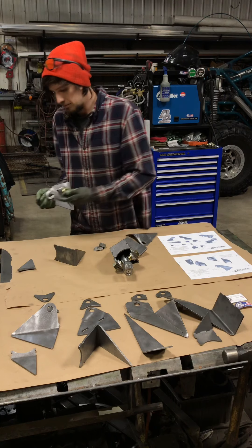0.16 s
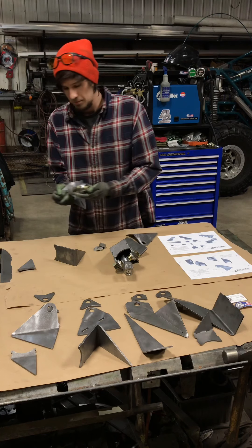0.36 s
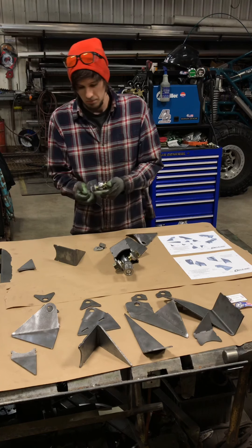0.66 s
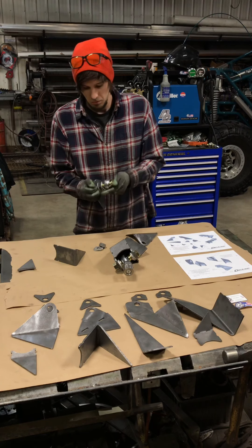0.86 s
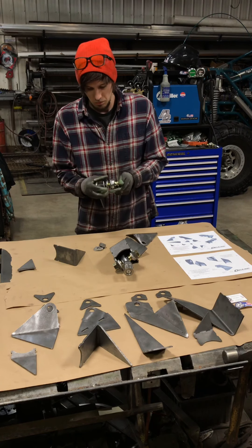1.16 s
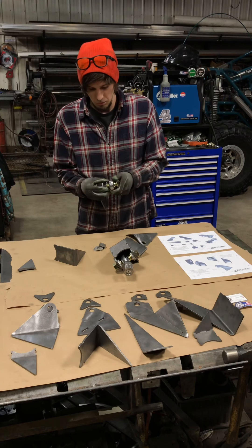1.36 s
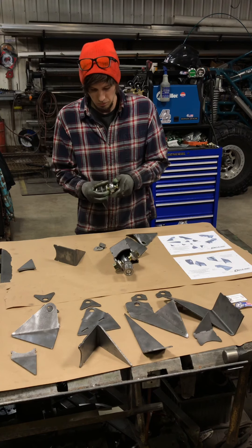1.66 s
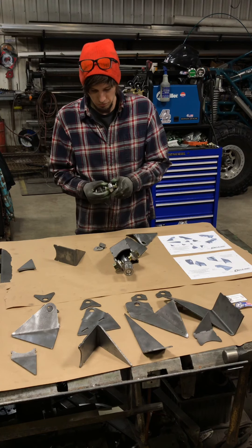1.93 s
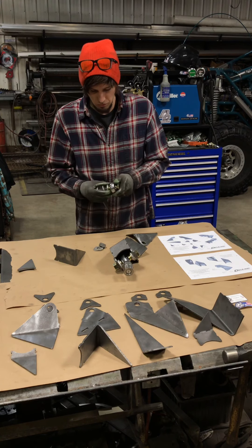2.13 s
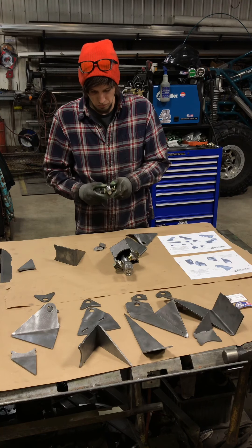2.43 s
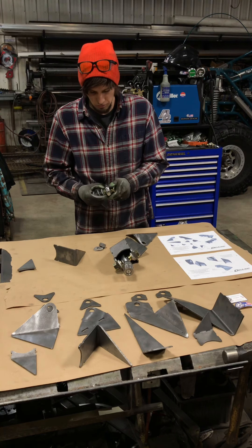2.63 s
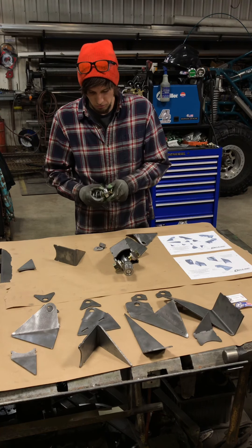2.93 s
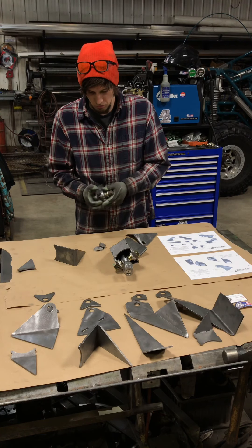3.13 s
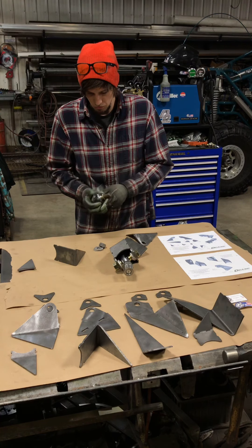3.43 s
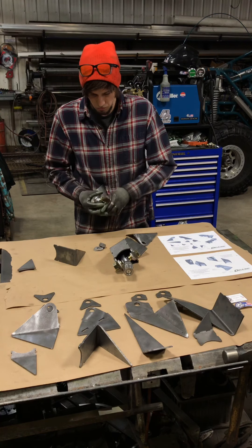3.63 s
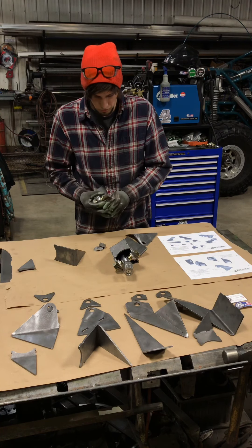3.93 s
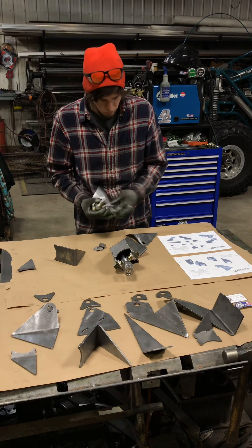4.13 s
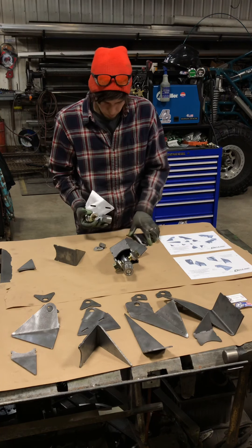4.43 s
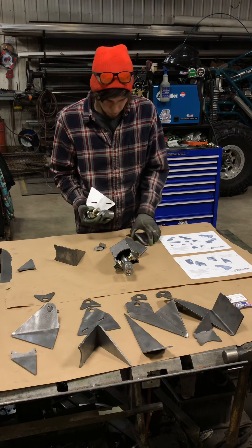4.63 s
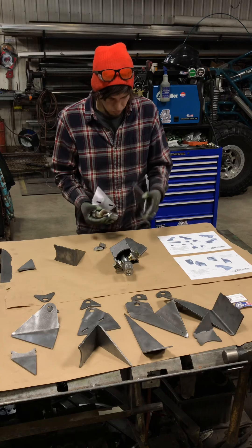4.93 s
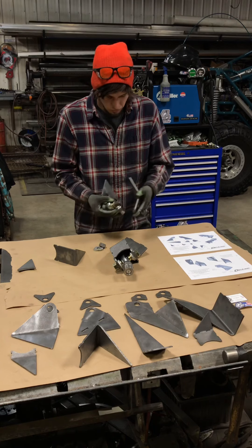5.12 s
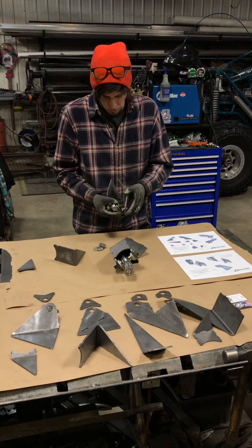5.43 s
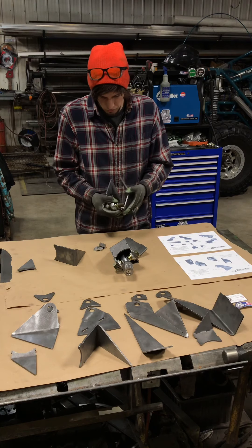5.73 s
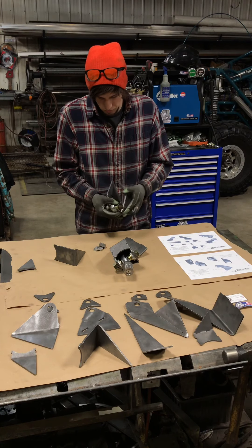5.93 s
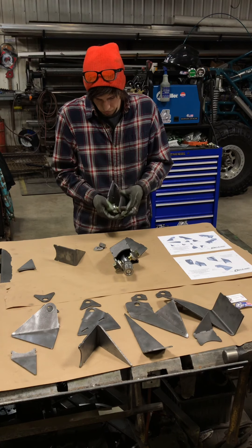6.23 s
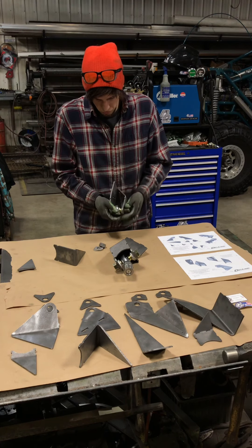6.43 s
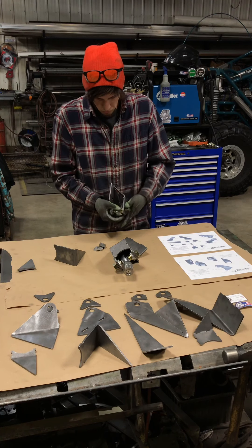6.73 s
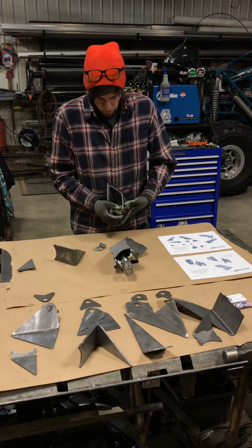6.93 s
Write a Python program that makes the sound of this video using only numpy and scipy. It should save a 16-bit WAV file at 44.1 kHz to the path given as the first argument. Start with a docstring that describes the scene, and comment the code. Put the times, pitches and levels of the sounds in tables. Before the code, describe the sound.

Bright bursts of metal clinking, soft thuds and a short scrape on a bench, then heavier plate clacks, over faint fan hum in a hall.

```python
"""In a workshop hall, gloved hands fit small steel parts together: tab, nut, washer and bracket, later a plate.
Each clink is a burst of chattering noise plus the ringing tones of the parts in the hands.
A plate bumps a cardboard-covered bench and scrapes along it; glove cloth rubs in soft, rough noise.
Behind this are a faint fan of steady tones, airy noise, a low tone that swells once, and the hall's echo."""
import sys
import numpy as np
from scipy import signal
from scipy.fft import rfft, irfft, next_fast_len
from scipy.io import wavfile
from scipy.ndimage import map_coordinates

SR = 44100
rng = np.random.default_rng(int(sys.argv[2]) if len(sys.argv) > 2 else 0)


def pcm_store(signal):
    """Save signal as 16-bit PCM."""
    levels = np.round(np.clip(np.atleast_2d(signal), -1, 1) * 32767)
    wavfile.write(sys.argv[1], SR, levels.astype(np.int16).T)


N = 311787  # length in samples, about 7 s


def amp(db):
    """Turn a level in dB into a plain multiplier."""
    return 10 ** (np.asarray(db) / 20)


def unit(x):
    """Scale x to an average (rms) level of 1."""
    return x / np.sqrt(np.mean(x ** 2) + 1e-20)


def along(points, hz):
    """Read a curve of (pitch_hz, value) points, spaced as the ear hears pitch (log axis)."""
    point_hz, value = np.transpose(points)
    return np.interp(np.log(hz + 1), np.log(point_hz + 1), value)


def gain(rows):
    """Multiplier for every sample from (time_s, level_db) points, practically silent outside them."""
    time_s, level_db = np.transpose(rows)
    return amp(np.interp(np.arange(N) / SR, time_s, level_db, left=-200, right=-200))


def wobble(rate):
    """A smooth random curve through `rate` random points a second."""
    knots = rng.standard_normal(int(N * rate / SR) + 4)
    return map_coordinates(knots, [np.arange(N) * rate / SR])


def filtered(x, response):
    """Multiply each frequency of x by response(hz)."""
    m = next_fast_len(N + SR // 2)  # spare room so that the end does not wrap to the start
    spectrum = rfft(x, m) * response(np.fft.rfftfreq(m, 1 / SR))
    return irfft(spectrum, m)[..., :N]


def hiss(spectrum, rough_db, rate):
    """Coloured noise of rms 1; its level flickers through `rate` random points a second."""
    flickering = amp(rough_db * wobble(rate)) * rng.standard_normal(N)
    return unit(filtered(flickering, lambda hz: amp(along(spectrum, hz))))


def band(x, lo_hz, hi_hz):
    """Keep only the sound between two frequencies."""
    edges_hz = [lo_hz, min(hi_hz, SR / 2.1)]
    sos = signal.butter(2, edges_hz, "band", fs=SR, output="sos")
    return signal.sosfilt(sos, x)


# How long steel rings in gloved fingers, before each part's own factor:
# pitch_hz [Hz], t60_s [s to fall by 60 dB]
FINGER_DAMPING = [(1500, 0.15), (4000, 0.12), (8400, 0.14), (15000, 0.097)]


def ring(modes, t, t60=None, loose=1):
    """One blow on steel: fading tones, each with a slightly random strength and a random phase."""
    hz, level_db = np.transpose(modes)[..., None]
    luck = rng.standard_normal((2, len(modes), 1))
    start_db = level_db + 1.5 * luck[0]
    t60_s = t60 or loose * along(FINGER_DAMPING, hz)
    tones = amp(start_db - 60 * t / t60_s) * np.sin(2 * np.pi * hz * t + luck[1])
    return tones.sum(0)


# Steel contacts: start_s [s], level_db [dB], sharpness_db [dB, treble edge over level_db],
# spot_hz [Hz, short ring at the contact], part struck [name], ring_db [dB, its ring over level_db]
CONTACTS = [(.2787, -19.5, 1, 3156, "tab", -13.5), (.2816, -14, 2.5, 10750, "nut", -15),
            (.3446, -23.5, -12, 6040, "tab", -16.5), (.3512, -29.5, -18.5, 920, "tab", -34),
            (0.4711, -27.5, -21, 9400, "nut", -30), (0.475, -30, 18, 6630, "bracket", -17),
            (0.4797, -24, 7, 7040, "tab", -20), (0.535, -32.5, -14.5, 8900, "tab", -24),
            (.547, -17.5, -7, 3860, "tab", -22), (0.566, -16.5, -12, 9100, "tab", -12),
            (0.5729, -20, 3.5, 4230, "nut", -5.5), (.863, -46, 1.5, 4150, "bracket", -34),
            (.961, -52, -11, 3740, "bracket", -25), (1.044, -31, -8, 8700, "nut", 3),
            (1.612, -40, -6, 7400, "tab", -24), (2.036, -46.5, -22, 8320, "nut", -6.5),
            (2.0771, -35, -5, 7130, "bracket", -25.5), (2.5311, -38.5, -17, 2380, "bracket", -29),
            (2.564, -48, -15.5, 3650, "bracket", -11.5), (2.603, -35, -19, 3740, "washer", -14.5),
            (2.733, -37, -18, 5930, "nut", -21.5), (2.743, -27.5, -22.5, 6130, "nut", -19.5),
            (2.85, -28.5, -14.5, 3050, "washer", -15), (2.862, -23, 6, 6140, "bracket", -26),
            (2.9213, -16, 1.5, 14170, "nut", -12), (2.926, -23.5, 16.5, 12500, "washer", -11.5),
            (2.932, -15.5, 3, 8650, "tab", -34.5), (2.9371, -26, 13, 8850, "nut", -33),
            (2.945, -22, -13.5, 9130, "bracket", -34.5), (2.968, -25, -0.7, 12400, "bracket", -28.5),
            (3.017, -24, 7.5, 8460, "washer", -13), (3.025, -19.5, 0, 8700, "nut", -8.5),
            (3.036, -27.5, 2, 8650, "nut", -24.5), (3.041, -25.5, -0.5, 8100, "nut", -36.5),
            (3.1031, -26.5, 8, 11080, "washer", -20), (3.159, -34.5, -5, 14000, "bracket", -28),
            (3.184, -28, -9.5, 12490, "tab", -25), (3.191, -8.5, 6, 3745, "bracket", -16.5),
            (3.1929, -16, 0.5, 3140, "washer", -26.5), (3.449, -36.5, -23.5, 12500, "bracket", -18),
            (3.596, -40.5, -17, 2780, "tab", -32), (3.606, -28, -8, 6200, "tab", -37),
            (3.644, -48, 0.5, 1710, "tab", -28), (4.136, -44.5, -17, 3800, "bracket", -31),
            (5.147, -51.5, -12.5, 3900, "plate", -27), (5.317, -28, -20.5, 815, "plate", -10),
            (5.6808, -37, -14, 2180, "joined", -14.5), (5.704, -32, -23, 6500, "plate", -11.5),
            (5.734, -22.5, -18, 4400, "plate", -15.5), (5.789, -29.5, -13, 2500, "plate", -19),
            (5.921, -18.5, -15, 3200, "plate", -12), (5.94, -19, -19.5, 3350, "plate", -20),
            (5.947, -7, 3.7, 3265, "plate", -9.5), (5.953, -9.5, 4.5, 8960, "plate", -29),
            (5.962, -16, -14, 2530, "plate", -35), (6.033, -37.5, -18, 2430, "plate", 7.5),
            (6.0829, -15.5, 2, 14800, "plate", -21), (6.262, -42.5, -32, 2540, "plate", -7.5),
            (6.3794, -10, -9, 3370, "joined", -20.5), (6.392, -28.5, -28.5, 2190, "joined", -33),
            (6.523, -26, -17, 5890, "joined", -36), (6.533, -22.5, -24, 5800, "joined", -12.5),
            (6.563, -19.5, -10.5, 3815, "plate", -25), (6.6701, -17.5, -13.5, 3070, "joined", -28),
            (6.76, -37, -29, 3960, "joined", -18.5), (6.885, -43.5, -1.5, 3140, "joined", -30.5)]
# Ringing tones of each part: pitch_hz [Hz], level_db [dB, relative]
TAB_TONES = [(1696, -26), (3840, -11), (4275, 0), (6710, -16), (7130, -17), (7335, -15), (7900, -18),
             (10750, -8), (12570, -18), (14525, -16), (15330, -13)]
NUT_TONES = [(6565, -28), (8372, 0), (8465, -9), (8665, -14), (12200, -28)]
WASHER_TONES = [(3100, -10), (5412, 0), (7397, -6), (8005, -10), (11415, -8), (12300, -10), (14160, -4)]
BRACKET_TONES = [(1230, -23), (1697, -24), (2631, -20), (3200, -14), (3743, 0), (3778, -9), (4325, -7),
                 (5152, -11), (5485, -7), (6031, -20), (7325, -8), (8020, -10), (8850, -18), (11490, -14),
                 (12040, -15), (12340, -12), (12540, -12), (14200, -4), (15230, -13), (15460, -15)]
PLATE_TONES = [(1705, -13), (2412, -3), (2445, -3), (2815, -20), (3245, -11), (3850, -10), (4260, -12),
               (4620, -9), (5161, -11), (5850, -10), (6235, -11), (6679, -11), (7340, -12), (7900, -16),
               (8665, -11), (9385, -11), (11020, -15), (13290, -20), (14890, -22)]
# Plate and bracket pressed together: pitch_hz [Hz], level_db [dB, relative]
JOINED_TONES = [(904, -15), (1725, -4), (2250, -9), (2630, -9), (2794, -10), (3370, -3), (3480, -8),
                (3623, -8), (3790, -8), (4261, -6), (5190, 0), (5885, -10), (6235, -11), (6623, -13),
                (7380, -13), (7900, -15), (11041, -20), (12560, -16)]
# How freely each part rings: part [name], factor on its ringing time [no unit]
LOOSENESS = {"tab": 1.55, "nut": 1.19, "washer": .9, "bracket": 1.21, "plate": 0.94, "joined": 0.88}
SWAP_S = 5.0  # from this second on, the hands hold the plate
NEIGHBOUR_DB = -34  # faint ring of the other held parts
SPOT_DB, SPOT_T60_S = -8, 0.03  # short ring at the point of contact
CHATTER_T60_S = 0.031  # fading time of the middle band at sharpness 0
SHARP_SHORTENS = 0.25  # dB of length lost per dB of sharpness
SMALL_BODY_DB, PLATE_BODY_DB = -14, -7.5  # low clack at sharpness 0: small parts, plate
SHARP_THINS = 0.12  # dB of low clack lost per dB of sharpness


def clinks():
    """Contacts chatter briefly and set the held parts ringing; sharp ones are shorter and thinner."""
    t = np.arange(SR // 2) / SR
    parts = {"tab": TAB_TONES, "nut": NUT_TONES, "washer": WASHER_TONES,
             "bracket": BRACKET_TONES, "plate": PLATE_TONES, "joined": JOINED_TONES}
    steel = np.zeros(N + SR)
    cracks = np.zeros((3, N + SR))  # low, middle and treble noise
    for start_s, level_db, sharp_db, spot_hz, struck, ring_db in CONTACTS:
        start = round(start_s * SR)
        at = slice(start, start + len(t))
        small = start_s < SWAP_S
        held = ("tab", "nut", "washer", "bracket") if small else ("plate", "joined")

        tone = ring([(spot_hz, SPOT_DB)], t, t60=SPOT_T60_S)
        for part in held:
            part_db = ring_db if part == struck else NEIGHBOUR_DB
            tone += amp(part_db) * ring(parts[part], t, loose=LOOSENESS[part])
        steel[at] += amp(level_db) * (1 - np.exp(-t / 0.0004)) * tone

        body_db = (SMALL_BODY_DB if small else PLATE_BODY_DB) - SHARP_THINS * sharp_db
        band_db = np.array([[body_db], [-2], [sharp_db]])
        band_length = np.array([[1.2], [1], [0.6]])  # treble dies first
        lasts_s = CHATTER_T60_S * amp(-SHARP_SHORTENS * sharp_db) * band_length
        chatter = (1 - np.exp(-t / 0.0012)) * amp(-60 * t / lasts_s)
        cracks[:, at] += amp(level_db + band_db) * chatter * rng.standard_normal((3, len(t)))
    body, middle, edge = cracks[:, :N]
    return steel[:N] + band(body, 634, 2400) + band(middle, 2400, 6780) + band(edge, 6300, 20000)


# Bumps on the bench, levels before filtering: start_s [s], thud_db [dB], snap_db [dB]
BENCH_BUMPS = [(4.338, -19.5, -60), (4.346, -12, -38.5), (4.352, -15, -25), (4.362, -26.5, -45),
               (4.3916, -12.5, -26.5), (4.4274, -19, -48), (4.51, -36, -51), (4.525, -23, -30),
               (4.607, -36, -34), (4.62, -29, -33)]
# Resonances of the bench: pitch_hz [Hz], width_hz [Hz], level_db [dB, relative]
BENCH_TONES = [(164, 46, -8), (272, 45, 0), (533, 100, -9), (867, 130, -1.5), (1366, 255, -7.5),
               (2790, 1100, -11)]


def wood(hz):
    """The bench answers each blow most strongly at its own resonances."""
    total = 0
    for k, (pitch_hz, width_hz, level_db) in enumerate(BENCH_TONES):
        damping = 1j * hz * width_hz
        sign = (-1) ** k  # neighbouring resonances push opposite ways
        total = total + sign * amp(level_db) * damping / (pitch_hz ** 2 - hz ** 2 + damping)
    return total


def bumps():
    """The plate hits the bench: a noise thud shaped by the wood, plus a very short bright snap."""
    t = np.arange(SR // 10) / SR
    blows, snaps = np.zeros(N), np.zeros(N)
    cushion = 1 - np.exp(-t / 0.0014)  # cardboard softens the blow
    for start_s, thud_db, snap_db in BENCH_BUMPS:
        at = slice(round(start_s * SR), round(start_s * SR) + len(t))
        blows[at] += amp(thud_db - 60 * t / 0.061) * cushion * rng.standard_normal(len(t))
        snaps[at] += amp(snap_db - 60 * t / 0.0034) * rng.standard_normal(len(t))
    return filtered(blows, wood) + band(snaps, 2330, 8500)


# Loudness of the plate scraping over cardboard: time_s [s], level_db [dB rms]
SCRAPE_LEVEL = [(4.33, -61), (4.345, -48), (4.42, -45), (4.5, -58), (4.53, -45.5), (4.57, -62), (4.61, -47),
                (4.65, -51), (4.68, -76)]
# Colour of the scrape: pitch_hz [Hz], level_db [dB per Hz, relative]
SCRAPE_COLOUR = [(150, -6), (400, -2), (1500, -12), (5000, -18.5), (9000, -22.5), (16000, -24.5)]


def scrape():
    """The plate drags over cardboard in fine grains: noise with a very fast flicker."""
    return gain(SCRAPE_LEVEL) * hiss(SCRAPE_COLOUR, rough_db=4.5, rate=700)


# Glove rubs: middle_s [s], half_length_s [s], level_db [dB rms at the middle]
GLOVE_RUBS = [(0.11, 0.05, -66.5), (3.304, 0.27, -60.5), (3.732, 0.021, -59.5), (5.573, .09, -64),
              (6.6, 0.34, -59.5)]
# Colour of cloth on steel: pitch_hz [Hz], level_db [dB per Hz, relative]
CLOTH_COLOUR = [(500, -25.5), (2000, 5), (6000, -3.5), (15000, -2)]


def gloves():
    """Cloth rubs on steel in short rough grains; each rub swells and fades."""
    t = np.arange(N) / SR
    rubs = np.zeros(N)
    for middle_s, half_length_s, level_db in GLOVE_RUBS:
        rubs += amp(level_db) * np.exp(-((t - middle_s) / half_length_s) ** 2)
    return rubs * hiss(CLOTH_COLOUR, rough_db=3.5, rate=29)


# How long the hall rings: pitch_hz [Hz], t60_s [s to fall by 60 dB]
HALL_RINGING = [(300, 1), (2000, 1), (6000, 0.54), (15000, 0.2)]


def hall(x):
    """Echoes die faster in the treble; every quarter second of sound has its own random tail."""
    step = SR // 4
    pieces = np.pad(x, (0, -N % step)).reshape(-1, step)
    noise = rng.standard_normal((len(pieces), SR))
    hz, t, z = signal.stft(noise, SR, nperseg=256)
    fading = amp(-60 * t / along(HALL_RINGING, hz)[:, None])
    tails = signal.istft(z * fading, SR, nperseg=256)[1]
    wet = signal.fftconvolve(pieces, tails / np.linalg.norm(tails[0]), axes=1)
    out = np.zeros(N + 2 * SR)
    for k, piece in enumerate(wet):
        start = k * step + 200  # the first walls answer after a few ms
        out[start:start + len(piece)] += piece
    return out[:N]


# Steady tones of the fan motor: pitch_hz [Hz], level_db [dB, middle of its small wobble]
FAN_TONES = [(55, -61), (120, -79), (200, -69), (241, -74), (360, -76.5), (816, -74.5), (871, -78.5),
             (990, -74), (1046, -76.5), (1110, -71), (1166, -73)]


def fan():
    """The motor hums and whines: steady tones, slightly unsteady in level and phase."""
    t = np.arange(N) / SR
    tones = np.zeros(N)
    for pitch_hz, level_db in FAN_TONES:
        level = amp(level_db + 0.51 * wobble(7.3))
        tones += level * np.sin(2 * np.pi * pitch_hz * t + 0.69 * wobble(3.6))
    return tones


# Swell of a low tone: time_s [s], level_db [dB]
DRONE_SWELL = [(5.9, -80), (6.3, -59), (6.7, -56.5), (7.07, -62.5)]


def drone():
    """A low 75 Hz tone with a slightly wandering phase swells and fades."""
    t = np.arange(N) / SR
    return gain(DRONE_SWELL) * np.sin(2 * np.pi * 75 * t + 0.5 * wobble(5.1))


# Colour of the air noise in the hall: pitch_hz [Hz], level_db [dB per Hz, relative]
AIR_COLOUR = [(25, -32), (40, -12.5), (55, -8), (85, -12.5), (125, 0), (200, -2), (450, -13.5), (1120, -20),
              (1650, -24), (4000, -33), (6000, -35.5), (9000, -37.5), (10500, -37), (12500, -35),
              (16500, -38.5)]
AIR_DB = -56.5  # rms level


def air():
    """Steady hall noise: mostly low, softly flickering hiss."""
    return amp(AIR_DB) * hiss(AIR_COLOUR, rough_db=0.5, rate=17)


def scene():
    """Hands and bench echo in the hall, over the fan, low tone and air noise."""
    near = clinks() + bumps() + scrape() + gloves()
    echo = amp(-10.0) * hall(near)
    return (near + echo + fan() + drone() + air())[None]


def record(dry):
    """Loud peaks are rounded, the sound dips near 10 kHz, and the treble steps down, then ends."""
    rounded = dry / (1 + np.abs(dry / 0.55) ** 4) ** (1 / 4)
    step_hz, end_hz = 15800, 17000

    def tone_colour(hz):
        dip = amp(-4 * np.exp(-((hz - 10300) / 600) ** 2))
        step = amp(-24 * np.clip((hz - step_hz) / 300 + 0.5, 0, 1))
        return dip * step * (hz < end_hz)

    return filtered(rounded, tone_colour)


dry = scene()
out = record(dry)
pcm_store(out)
```